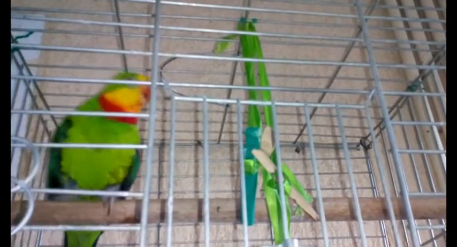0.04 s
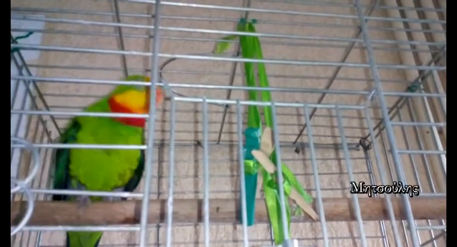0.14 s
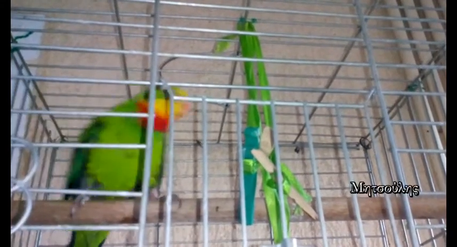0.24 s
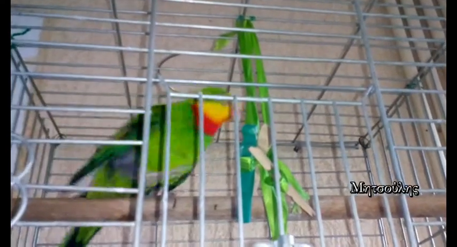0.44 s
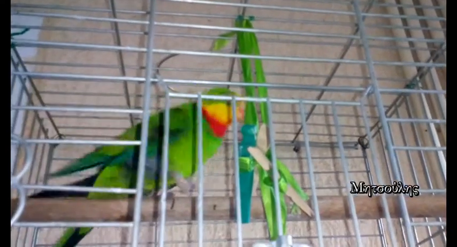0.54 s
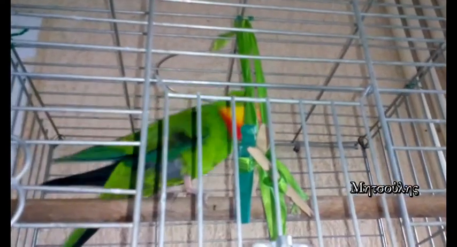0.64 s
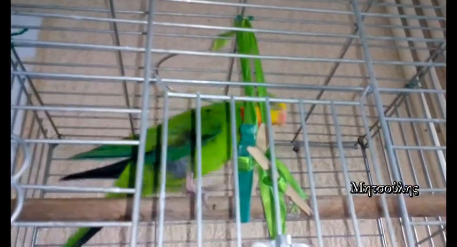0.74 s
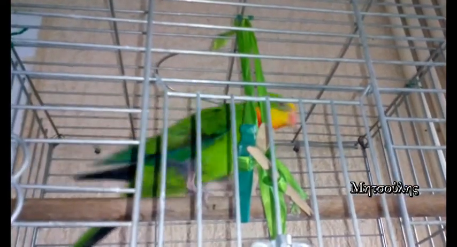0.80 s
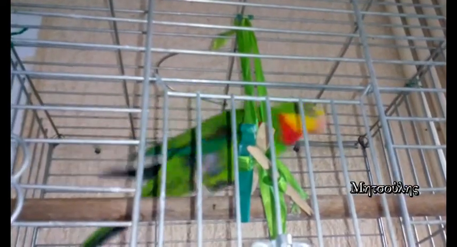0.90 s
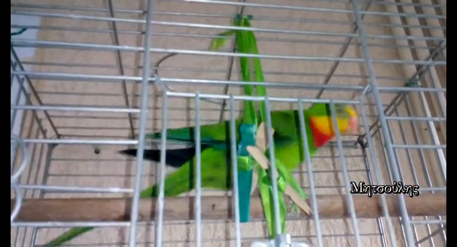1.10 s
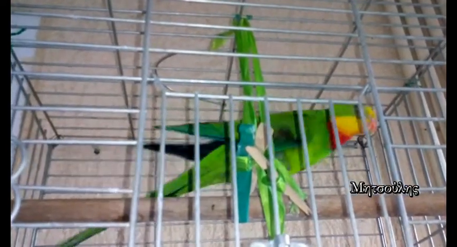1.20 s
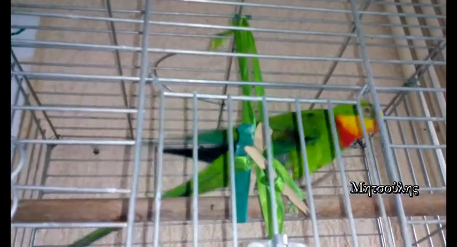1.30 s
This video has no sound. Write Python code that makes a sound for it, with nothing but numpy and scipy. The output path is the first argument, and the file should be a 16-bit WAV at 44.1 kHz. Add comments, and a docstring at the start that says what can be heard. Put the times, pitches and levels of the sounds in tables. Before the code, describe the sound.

One loud, harsh parrot squawk, rapidly warbling then slowing and ending on a short clipped note, close to an overloaded microphone; fainter raspy chirps from a farther bird come before and after, in a hard, ringing room.

```python
"""A parrot close by gives one loud squawk, a warble that slows down and then a short closing note: a few
partials follow a swinging pitch, a rasp roughens them and a fixed throat filters them.
A second bird further off chirps before and after it, with two raspy whistles sounding at once.
Echoes and a ringing hard room follow both birds; low tones waver over a room tone of filtered noise,
and the loudest swings overload the recorder."""
import sys
import numpy as np
from scipy import signal
from scipy.fft import rfft, irfft
from scipy.io import wavfile

SR = 44100
rng = np.random.default_rng(int(sys.argv[2]) if len(sys.argv) > 2 else 0)


def magnitude_from_level(level_db):
    """Linear magnitude for a level in decibels (20 dB per decade)."""
    exponent = np.asarray(level_db, float) / 20
    return 10 ** exponent


def output_pcm(signal):
    """Save a mono or channel-first signal as 16-bit PCM at the path in sys.argv[1].

    Samples are clipped to [-1, 1] before scaling.
    """
    pcm = np.clip(np.atleast_2d(signal).T, -1, 1) * 32767
    wavfile.write(sys.argv[1], SR, np.round(pcm).astype(np.int16))


N = 59535  # length in samples

# Room tone: spectrum before it is scaled as a whole: f/Hz, level/dB
TONE_SPECTRUM = [(12, -47), (20, -21), (60, -28), (90, -14.5), (150, -16), (256, -25.5), (433, -24),
                 (656, -21), (1210, -29), (2100, -29.5), (2480, -38.5), (3090, -34), (3860, -42),
                 (6200, -45), (7300, -58.5), (15000, -74)]
# Gain of the mid band of the room tone: t/s, level/dB
MID_GAIN = [(0, 3.5), (.1, 0.5), (.2, 0), (.5, -7.5), (.75, -6), (1.0, -4), (1.15, 0.5), (1.35, 1.5)]
# Gain of the rumble: t/s, level/dB
RUMBLE_GAIN = [(0, 7), (.15, 6.5), (.3, -1.5), (.6, -3.5), (.8, -6.5), (1.0, 4), (1.25, 3.5), (1.35, 5.5)]
# Wandering low hum: t/s, f/Hz, level/dB
HUM_CONTOUR = [(0.0, 106.3, -40.5), (0.036, 114.7, -40), (0.09, 132.1, -33), (0.156, 121.4, -44),
               (0.194, 135.5, -41), (0.338, 136.1, -48.5), (0.394, 117.3, -53), (0.514, 116.3, -60),
               (0.56, 139.3, -55.5), (0.672, 133.2, -33.5), (0.728, 116.4, -59.5), (0.766, 116.8, -51.5),
               (0.822, 134.6, -40.5), (0.864, 132.8, -44.5), (0.91, 117.1, -54), (0.988, 114.1, -31),
               (1.056, 119.6, -44), (1.198, 116.5, -32.5), (1.218, 115.6, -47), (1.35, 115.9, -35.5)]
# Fainter low lines: f/Hz, rms pitch waver f/Hz
DRONE_LINES = [(184, 9.3), (328, 6.9)]
# One level contour per faint line: t/s, level/dB
DRONE_CONTOURS = [
    [(0.0, -54), (0.066, -42.5), (0.582, -69.5), (0.654, -46), (0.882, -59), (1.35, -48)],
    [(0.0, -64), (0.12, -72), (0.214, -54.5), (0.906, -66.5), (1.048, -42.5), (1.082, -63.5), (1.108, -60),
     (1.194, -48), (1.248, -61.5), (1.35, -54.5)],
]
# Far bird, one contour per note, before its filter: t/s, f/Hz, level/dB
CHIRP_NOTES = [
    [(.004, 4270, -42.5), (.014, 4900, -31), (.02, 5150, -37), (.023, 5150, -22), (.03, 5370, -35.5),
     (.038, 5106, -22), (.046, 5164, -39), (.053, 5270, -32), (.058, 5170, -43), (.063, 5150, -42),
     (.07, 5650, -37)],
    [(.026, 4080, -32), (.033, 3674, -29), (.044, 3335, -35), (.054, 2670, -41), (.064, 3350, -31),
     (.074, 3456, -26), (.081, 4150, -30.5), (.088, 4206, -33.5), (.092, 3000, -35.5), (.097, 2910, -27.5),
     (.106, 2930, -48)],
    [(.77, 5360, -46), (.779, 5310, -39), (.786, 5250, -44), (.789, 4900, -31.5), (.8, 4600, -28.5),
     (.812, 4846, -25.5), (.822, 4700, -25.5), (.838, 5300, -38), (.848, 4750, -34), (.87, 4114, -34),
     (.891, 4520, -43), (.9, 4500, -55)],
    [(.772, 3133, -42), (.79, 3100, -39), (.805, 3900, -30.5), (.818, 3580, -32), (.83, 3013, -33.5),
     (.845, 3300, -32), (.862, 2930, -25.5), (.876, 4050, -34.5), (.89, 4100, -32.5), (.905, 4100, -62)],
]
# Octave relative to the fundamental, one per note: level/dB
CHIRP_OCTAVES = [-40, -8.5, -15, -6]
# Pitch jitter, one per note: rms fraction of the pitch
CHIRP_JITTERS = [0.0099, 0.035, 0.057, 0.0603]
# Filter of the far bird: f/Hz, level/dB
CHIRP_FILTER = [(2000, -1.5), (5500, 3.5), (6800, -6.5), (7800, -23.5), (9500, -20.5), (11000, -57)]
# Single reflections: delay t/s, level/dB relative to the direct sound
REFLECTIONS = [(.0045, -15.5), (.008, -13), (0.012, -12), (0.02, -16), (.028, -15)]
# Filter ahead of the reverberation: f/Hz, level/dB
ROOM_FILTER = [(500, 2), (1500, -6.5), (2600, -1), (4000, 2.5), (8000, 2)]
# Time to decay by 60 dB: f/Hz, t/s
ROOM_DECAY = [(500, 0.51), (1500, 0.63), (3000, 0.66), (4100, 0.56), (5000, 0.5), (8000, 0.46)]
# Turning points of the parrot's pitch: t/s, f/Hz
PITCH_TURNS = [(.225, 760), (0.234, 1072), (.236, 862), (.242, 1317), (0.243, 874), (0.248, 1315),
               (0.2507, 889), (.258, 1303), (.263, 933.5), (.271, 1333), (.276, 918.4), (0.282, 1407),
               (.288, 994.2), (0.296, 1516), (0.303, 1002), (.312, 1513), (0.322, 1040), (.332, 1512),
               (0.338, 947.6), (.37, 1672), (.381, 1256), (.389, 1400), (0.403, 1208), (0.43, 1606),
               (.434, 1385), (.444, 1670), (0.452, 1182), (.464, 1730), (.485, 1750), (0.5, 1411),
               (0.508, 1515), (.515, 1532), (.53, 1520)]
# Parrot's effort: t/s, level/dB
EFFORT_CONTOUR = [(.224, -29.5), (.231, -14.5), (.237, -22.5), (.245, -11), (.256, -9.5), (.269, -7.5),
                  (.282, -9), (.3, -9.5), (.318, -5.5), (.326, -15.5), (.335, -4), (.343, -12),
                  (.354, -5.5), (.363, -9.5), (.374, -17.5), (.379, -4.5), (.386, -10), (.392, -7),
                  (.401, -12), (.413, -9), (.421, -13.5), (.426, -10), (.431, -22), (.438, -13),
                  (.446, -15.5), (.455, -9.5), (.468, -15.5), (.478, -34), (.494, -40), (.5, -2.5),
                  (.508, -7.5), (.514, -11), (.524, -66.5)]
# Changes of timbre: t/s, octave level/dB, higher partials level/dB, rasp level/dB
TIMBRE = [(.224, -7, -31, 5), (.27, 2.5, -8.5, -0.5), (.3, -4, -1.5, 3), (.33, -1, -1.5, -0.5),
          (.365, -2, -0.5, -1), (.385, 1.5, -2.5, -9), (.41, 0.5, 2.5, -13), (.43, 1.5, 0, 1),
          (.455, -2, 2.5, 2.5), (.47, 1, -13.5, 4.5), (.499, -16, -11, -7), (.504, -11, 0, -4.5),
          (.507, 1.5, -4, -14.5), (.52, 0.5, -20, -12)]
# Partials 1 to 6 before changes of timbre and throat filter: level/dB
PARTIALS_DB = [3.5, 8, -3, -6, -13.5, -13]
# Resonances of the throat: f/Hz, level/dB
THROAT_FILTER = [(500, -39), (800, -21.5), (1000, -16), (1250, -16), (1470, -2.5), (1750, -3), (1950, -6.5),
                 (2600, -4.5), (3200, -5.5), (3700, -5), (4200, -16.5), (4550, -8), (4900, 0.5),
                 (5250, -13), (5700, -19.5), (7400, -18.5), (8000, -24.5), (9500, -39)]


def curve(points, t):
    """Piecewise linear interpolation of a two-column table."""
    return np.interp(t, *np.transpose(points))


def colour(x, points):
    """Linear filtering: the spectrum is multiplied by gains given at (f/Hz, level/dB)."""
    f, db = np.transpose(points)
    hz = np.fft.rfftfreq(len(x), 1 / SR)
    gain = magnitude_from_level(np.interp(np.log(hz + 1), np.log(f), db))
    return irfft(rfft(x) * gain, len(x))


def wobble(hz):
    """Random modulation: low-passed noise of unit rms, slower than hz."""
    b, a = signal.butter(2, min(hz, 5000), fs=SR)
    noise = signal.lfilter(b, a, rng.standard_normal(N))
    return noise / np.sqrt(np.mean(noise ** 2) + 1e-20)


def background():
    """Shaped broadband noise: room tone whose rumble and mid band swell separately."""
    t = np.arange(N) / SR
    tone = colour(rng.standard_normal(N), TONE_SPECTRUM)
    high = signal.butter(4, 230, "high", fs=SR, output="sos")
    tone = tone * magnitude_from_level(-48) / np.std(signal.sosfilt(high, tone))  # rms in dB above 230 Hz, before the swells
    mid = signal.sosfiltfilt(signal.butter(2, [400, 1100], "band", fs=SR, output="sos"), tone)
    rumble = signal.sosfiltfilt(signal.butter(2, 280, fs=SR, output="sos"), tone)
    mid_change = mid * (magnitude_from_level(curve(MID_GAIN, t)) - 1)
    rumble_change = rumble * (magnitude_from_level(curve(RUMBLE_GAIN, t)) - 1)
    return tone + mid_change + rumble_change


def line(hz, db, waver_hz):
    """Frequency and amplitude modulation: a low tone wavers at random in pitch and strength."""
    strength = np.sqrt(2) * magnitude_from_level(db) * (1 + 0.15 * wobble(40))
    phase = 2 * np.pi * np.cumsum(hz + waver_hz * wobble(14)) / SR
    return strength * np.cos(phase)


def hum():
    """Superposition of tones: the wandering hum and two fainter lines above it."""
    t = np.arange(N) / SR
    s, hz, db = np.transpose(HUM_CONTOUR)
    out = line(np.interp(t, s, hz), np.interp(t, s, db), waver_hz=5)
    for (f, waver_hz), contour in zip(DRONE_LINES, DRONE_CONTOURS):
        out = out + line(f, curve(contour, t), waver_hz)
    return out


def far_bird():
    """Modulated whistles: each note is a raspy fundamental with its octave, following a contour."""
    t, out = np.arange(N) / SR, np.zeros(N)
    for note, jitter, octave_db in zip(CHIRP_NOTES, CHIRP_JITTERS, CHIRP_OCTAVES):
        s, hz, db = np.transpose(note)
        pitch = np.interp(t, s, hz) * (1 + jitter * wobble(300))
        phase = 2 * np.pi * np.cumsum(pitch) / SR
        sounding = (t > s[0]) & (t < s[-1])
        rasp = 1 + magnitude_from_level(-1.5) * wobble(300)
        whistle = np.cos(phase) + magnitude_from_level(octave_db) * np.cos(2 * phase)
        out += magnitude_from_level(np.interp(t, s, db)) * sounding * rasp * whistle
    return colour(out, CHIRP_FILTER)


def echoes(x):
    """Specular reflection: single delayed copies off the nearest walls."""
    return sum(magnitude_from_level(db) * np.roll(x, round(s * SR)) for s, db in REFLECTIONS)


def room(x, first_s):
    """Diffuse reverberation: dense taps of random sign, each band decaying at its own speed."""
    present = (rng.random(SR) < .1) & (np.arange(SR) > first_s * SR)
    taps = rng.choice([-1., 1.], SR) * present
    hz, t, bands = signal.stft(taps, SR, nperseg=256)
    decay = magnitude_from_level(-60 * t / curve(ROOM_DECAY, hz)[:, None])
    tail = signal.istft(bands * decay, SR, nperseg=256)[1]
    return signal.fftconvolve(colour(x, ROOM_FILTER), tail / np.linalg.norm(tail))[:N]


def parrot():
    """Source and filter: harmonic partials glide between pitch turns, roughen and pass a fixed throat."""
    t = np.arange(N) / SR
    s, hz = np.transpose(PITCH_TURNS)
    place = np.interp(t, s, np.arange(len(s)))
    place = np.floor(place) + .5 - .5 * np.cos(np.pi * (place % 1))  # smooth each swing
    pitch = np.interp(place, np.arange(len(s)), hz)

    # early on, the voice thins out while the pitch drops fast: 15 dB at 150 octaves/s
    fall_oct_per_s = -np.gradient(np.log2(pitch)) * SR
    early = np.clip((.3 - t) / 0.046, 0, 1)
    dip = magnitude_from_level(-15 * np.clip(fall_oct_per_s / 150, 0, 2) * early)

    s, *columns = np.transpose(TIMBRE)
    octave, upper, rasp = (np.interp(t, s, column) for column in columns)
    jitter = 0.016 * magnitude_from_level(rasp) * wobble(340)
    phase = 2 * np.pi * np.cumsum(pitch * (1 + jitter)) / SR
    timbre = [0, octave, upper, upper, upper, upper]
    voice = np.zeros(N)
    for k, db in enumerate(PARTIALS_DB):
        rasp_db = -15.5 + rasp + 4.5 * k  # higher partials are rougher
        roughness = 1 + magnitude_from_level(rasp_db) * wobble(562)
        voice += magnitude_from_level(db + timbre[k]) * np.sin((k + 1) * phase) * roughness
    sounding = (t > EFFORT_CONTOUR[0][0]) & (t < EFFORT_CONTOUR[-1][0])
    return colour(voice * magnitude_from_level(curve(EFFORT_CONTOUR, t)) * dip * sounding, THROAT_FILTER)


def scene():
    """Superposition: direct sound, reflections and reverberation of both birds over hum and room tone."""
    near, far = parrot(), far_bird()
    near_in_room = near + echoes(near) + magnitude_from_level(-10) * room(near, first_s=0.015)
    far_in_room = magnitude_from_level(-4.5) * (far + echoes(far)) + magnitude_from_level(-7) * room(far, first_s=0.0082)
    return (near_in_room + far_in_room + background() + hum())[None]


def top_cut(x):
    """Nothing passes above the cut-off."""
    return signal.sosfilt(signal.butter(12, 15700, fs=SR, output="sos"), x)


def record(dry):
    """Hard clipping: swings beyond full scale overload the recorder and are cut flat."""
    mix = np.clip(dry, -1.0, 1.0)
    return top_cut(mix)


dry = scene()
out = record(dry)
output_pcm(out)
```